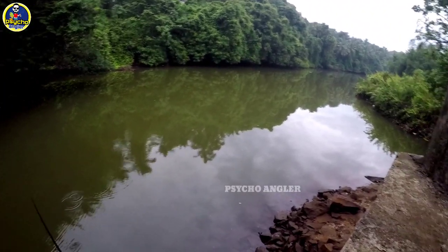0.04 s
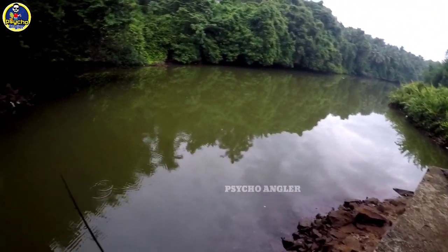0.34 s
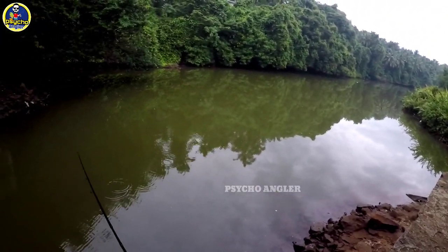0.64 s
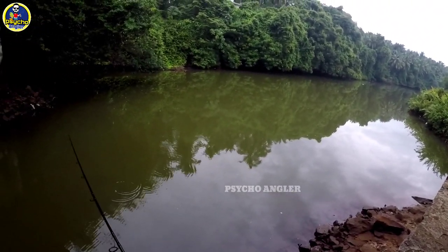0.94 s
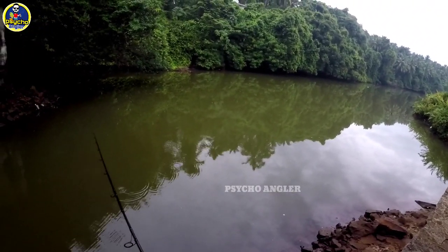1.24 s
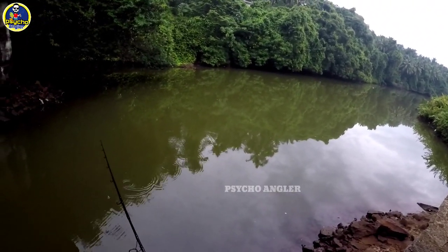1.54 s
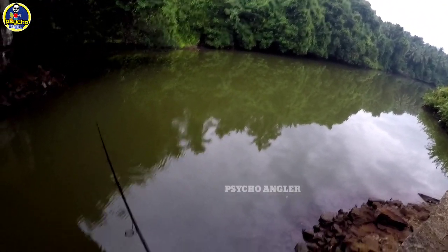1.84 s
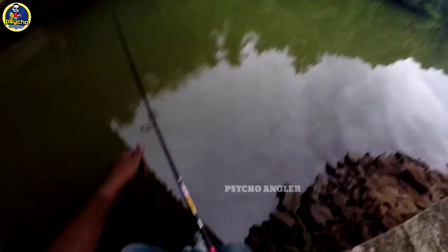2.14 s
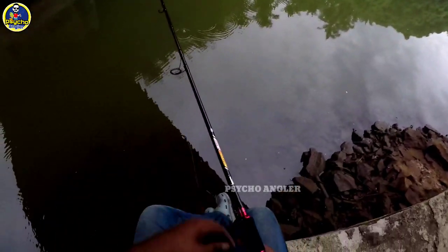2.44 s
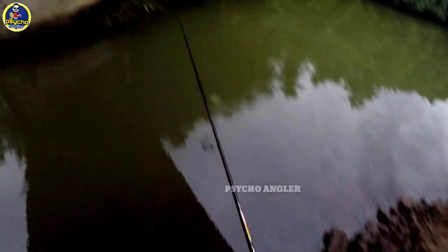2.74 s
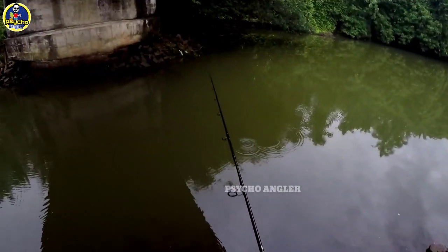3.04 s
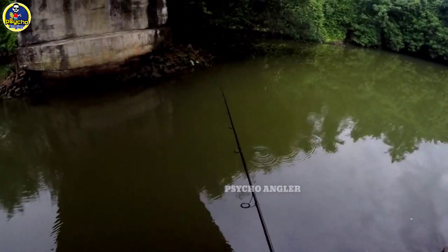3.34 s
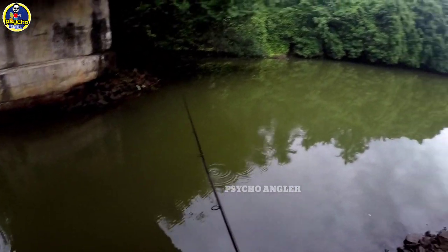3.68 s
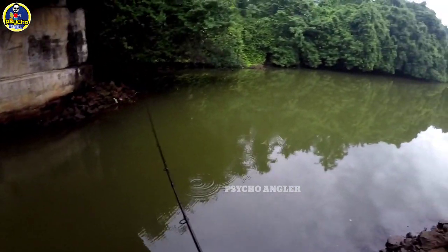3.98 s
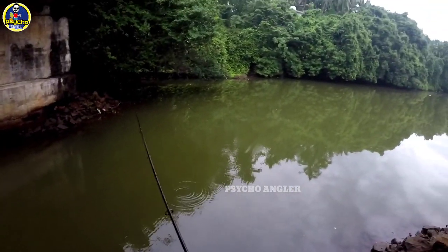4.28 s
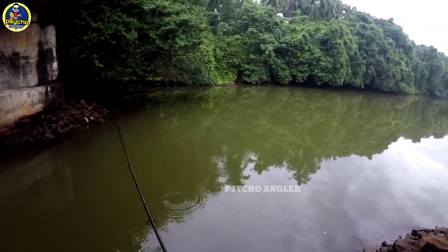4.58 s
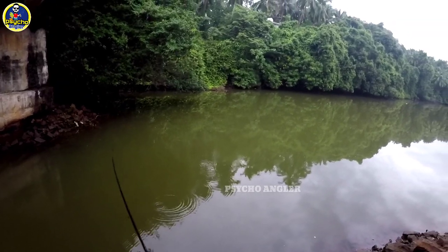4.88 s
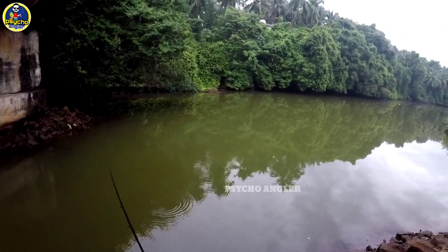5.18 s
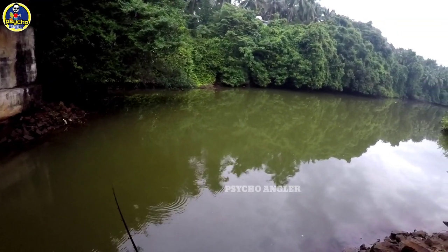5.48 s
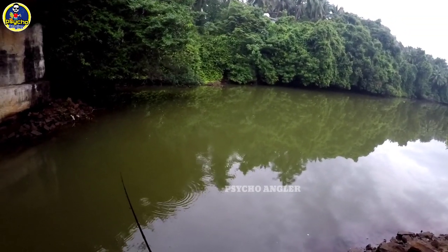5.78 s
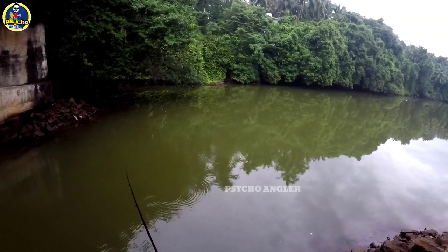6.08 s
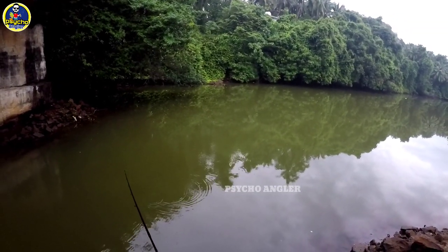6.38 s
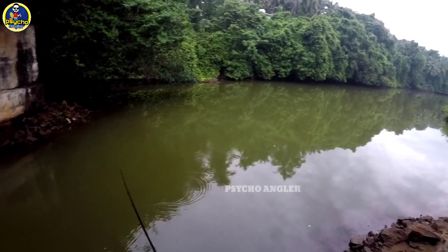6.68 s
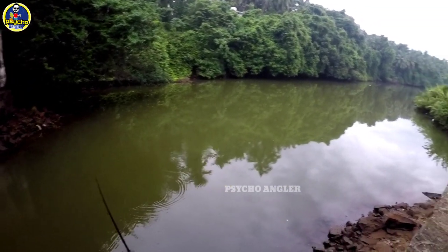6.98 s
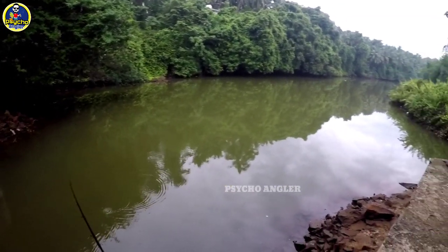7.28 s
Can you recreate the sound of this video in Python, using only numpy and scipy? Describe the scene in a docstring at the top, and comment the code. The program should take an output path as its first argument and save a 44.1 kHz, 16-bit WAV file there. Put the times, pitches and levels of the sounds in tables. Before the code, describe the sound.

Small birds chirp faintly by a river and a fishing reel snaps shut as heavy vehicles build to a low, booming rumble overhead.

```python
"""Fishing under a road bridge

Heavy traffic and a throbbing truck roll onto a concrete deck, which booms in its low modes, while
tyres roar faintly and distant brake discs squeal. Birds whistle, chirp and scold in the riverbank
trees. Close by, line swishes off a rod, the reel snaps shut and a sleeve brushes past."""
import sys
import numpy as np
from scipy import signal
from scipy.fft import rfft, irfft
from scipy.io import wavfile
from scipy.ndimage import uniform_filter1d

SR = 44100
rng = np.random.default_rng(int(sys.argv[2]) if len(sys.argv) > 2 else 0)


def wrap_up_sound(samples):
    """Save the sound to the file named by the first command line argument, as 16-bit audio."""
    columns = np.atleast_2d(samples).T
    # keep every value between -1 and 1, then stretch to whole-number steps
    tamed = np.clip(columns, -1, 1)
    steps = np.round(tamed * 32767).astype(np.int16)
    wavfile.write(sys.argv[1], SR, steps)


N = 331632
TIME = np.arange(N) / SR
SIDE = np.array([[1], [-1]])  # adds to the left ear, subtracts from the right


# weight of traffic, as the shaking of the spans: (time [s], level [dB])
DECK_LOAD = [(0, -66), (0.65, -51), (1.3, -53), (1.85, -54.5), (2.15, -50.5), (2.5, -42.5), (3.3, -33.5),
             (4.2, -29), (4.45, -25.5), (5.0, -25), (5.4, -21.5), (5.65, -23), (5.85, -22.5), (6.1, -23),
             (6.7, -24), (7.3, -24.5), (7.52, -25.5)]
# sub, boom and drum resonances of the bridge: (frequency [Hz], width [Hz], level [dB])
SPAN_MODES = [(19.75, 1.31, -7), (26.8, 3, -2), (40.58, 2.1, 0), (46.8, 9.5, -4)]
GIRDER_MODES = [(63.43, 1.5, -3.5), (76.8, 1.8, -1.2)]
SLAB_MODES = [(99.4, 3.1, 4.5), (122.11, 1.5, 1.5), (161.7, 3.6, -10)]

def bridge(full_load_db=-22, axles_past_s=6.59, settle_db_per_s=14):
    """Under one load the spans heave, the girders boom and the slab drums, all nearly mono."""
    span_db = along(DECK_LOAD)[0]
    load_db = span_db - full_load_db
    settling_db = settle_db_per_s * np.maximum(TIME - axles_past_s, 0)
    girder_db = full_load_db - 4.5 + 1.055 * load_db - settling_db
    slab_db = full_load_db - 6.5 + 1.12 * load_db
    parts = (span_db, SPAN_MODES, 65), (girder_db, GIRDER_MODES, 110), (slab_db, SLAB_MODES, 220)
    out = 0
    for level_db, modes, lowpass_hz in parts:
        mid, side = shaken(modes, lowpass_hz), shaken(modes, lowpass_hz)
        out += from_db(level_db + 1.5 * drift(8)) * (mid + from_db(-23) * side * SIDE)
    return panned(out, pan_db=-0.7)


def shaken(modes, lowpass_hz, steady_s=0.2):
    """Rolling wheels shake a set of modes; many axles together keep the power even."""
    out = np.zeros(N)
    for hz, width_hz, db in modes:
        radius = np.exp(-np.pi * width_hz / SR)
        feedback = [1, -2 * radius * np.cos(2 * np.pi * hz / SR), radius ** 2]
        force = rng.standard_normal(N + SR)
        out += from_db(db) * rms_one(signal.lfilter([1, 0, -1], feedback, force)[SR:])
    out = signal.sosfilt(signal.butter(5, lowpass_hz, fs=SR, output="sos"), out)
    window = int(steady_s * SR)
    power = uniform_filter1d(uniform_filter1d(out ** 2, window), window)
    return out / np.sqrt(power + 1e-12)


# the truck's pass: (start [s], attack [s], hold [s], release [s])
TRUCK_PASS = (6.0, 0.83, 0.63, 0.8)
# its engine orders: (multiple of the firing rate, level [dB])
TRUCK_ORDERS = [(1, -21), (1.5, -35), (2, -38), (2.5, -33), (3, -39), (4, -49), (6, -54)]

def truck(firing_hz=40.2, waver=0.01207, throb_db=2.5):
    """A big engine fires steadily as it rolls across, throbbing through the deck."""
    phase = 2 * np.pi * np.cumsum(firing_hz * (1 + waver * drift(4.3))) / SR
    firing = sum(from_db(db + throb_db * drift(2.8)) * np.sin(order * phase)
                 for order, db in TRUCK_ORDERS)
    return panned(np.sqrt(2) * swell(*TRUCK_PASS) * firing, pan_db=-0.5)


# one sub thump: (time [s], half-width [s], pitch [Hz], peak [dB])
AXLE_JOLT = (5.85, 0.02, 37.5, -20.5)

def jolt():
    """A heavy axle drops over a joint and the span heaves once."""
    s, width_s, hz, db = AXLE_JOLT
    return from_db(db) * bump(s, width_s) * np.sin(2 * np.pi * (hz * TIME + rng.random()))


# engine hums: (start [s], length [s], pitch [Hz], level [dB])
BOOMS = [(2.45, 0.35, 159.2, -41.5), (3.0, .4, 159, -42), (3.38, 0.32, 198.8, -39.5),
         (4.33, .3, 221.8, -44.5), (4.42, 0.39, 255, -49.5), (6.15, 0.52, 263.4, -49),
         (6.8, 0.46, 183.6, -38), (7.1, 0.44, 160.5, -33.5)]
# contour of each: (position [0-1], pitch ratio, level [dB])
BOOM_SHAPE = [(0, 1.01, -13), (.35, 1, -0.5), (.7, 1, -1.5), (1, 0.97, -14)]

def booms():
    """Passing engines swell into brief, wavering hums in the hollow under the deck."""
    mid, side = (glides(BOOMS, BOOM_SHAPE, rasp=0.013, rasp_hz=17) for _ in range(2))
    return panned(mid + from_db(-20) * side * SIDE, pan_db=-2.0)


# fader moves of the traffic bed: (time [s], tyre roar [dB], engine drone [dB])
TRAFFIC = [(0, -58.5, -42.5), (1.2, -57, -41.5), (2.1, -55.5, -40.5), (3.5, -55, -40.5),
           (5.4, -52.5, -40.5), (6.1, -53, -38.5), (6.7, -51, -40), (7.1, -49.5, -37.5),
           (7.52, -50.5, -38.5)]
# colours of its three layers: (frequency [Hz], level [dB])
DRONE_EQ = [(60, -35.5), (120, -27.5), (140, -3.5), (158, 0), (185, -1.5), (215, -6.5), (260, -13),
            (315, -19), (420, -44.5), (700, -72)]
FAR_ROAD_EQ = [(200, -28), (350, 2), (520, 2), (700, -6), (1000, -11), (2000, -35), (6000, -41)]
TYRE_EQ = [(400, -17.5), (650, -1.5), (900, -0.5), (1150, -1.5), (1600, -2.5), (2300, -6.5), (3200, -10.5),
           (5000, -16.5), (7500, -16.5), (11000, -29), (15000, -57)]

def road(light_traffic_db=-58):
    """Engines drone under the deck; the far road murmurs, nearer tyres roar over the parapet."""
    tyre_db, drone_db = along(TRAFFIC)
    far_db = -61 + 0.57 * (tyre_db - light_traffic_db)  # rises with the flow
    drone = from_db(drone_db + 0.53 * drift(4.3)) * air_noise(DRONE_EQ)
    far = from_db(far_db) * air_noise(FAR_ROAD_EQ)
    tyres = from_db(tyre_db + 1.27 * drift(3.8)) * air_noise(TYRE_EQ)
    return panned(drone, pan_db=-2.0) + panned(far + tyres, pan_db=0.5)


# squeals, sinking as the wheel slows: (start [s], attack [s], hold [s], release [s], pitch [Hz],
# sink [Hz/s], level [dB], upper-mode trim [dB], octave trim [dB])
SQUEALS = [ (0.021, 0.23, 0.26, 1.4, 3974, 150, -66, -20, -30),
           (1.58, .1, .1, .13, 3410, 64, -55.5, -3, -35),
           (1.865, .03, .035, .24, 3395, 64, -54.5, -11, -35),
           (2.599, 0.062, 0.031, 0.13, 2927, 160, -59, -20, -28),
           (2.748, 0.13, 0.29, 0.2, 2870, 190, -64.5, -20, -30),
           (2.998, 0.5, 0.55, 0.68, 3732, 12, -54, -22, -21),
           (5.107, 0.038, 0.37, 0.36, 3392, 25, -50.5, -2, -28)]
# upper modes of a disc: (multiple of the pitch, level [dB])
DISC_MODES = [(1.125, -6.5), (2.755, -12), (2.875, -16.5)]
# flares on the main tone and its octave: (time [s], half-width [s], boost [dB])
PAD_GRABS = [(0.45, 0.022, 1), (3.595, 0.026, 10.5), (3.68, 0.021, 1.5), (3.98, 0.051, 2),
             (5.19, 0.025, 5.5), (5.3, 0.02, 3.5), (5.425, 0.022, 10), (5.477, .02, 9)]

def brakes(waver=0.00452, flutter_db=3.5):
    """Discs sing in a few unsteady partials as the pads stick and slip, and flare when a pad grabs."""
    out = np.zeros(N)
    grab_db = sum(db * bump(s, width_s) for s, width_s, db in PAD_GRABS)
    for start, attack_s, hold_s, release_s, start_hz, sink, db, upper_db, octave_db in SQUEALS:
        hz = (start_hz - sink * (TIME - start)) * (1 + waver * drift(57.5))
        phase = 2 * np.pi * np.cumsum(hz) / SR
        tone = np.sin(phase) + from_db(octave_db) * np.sin(2 * phase)
        tone *= from_db(grab_db + flutter_db * drift(62))
        upper = sum(from_db(mode_db) * np.sin(multiple * phase) for multiple, mode_db in DISC_MODES)
        upper *= from_db(upper_db + flutter_db * drift(28))
        out += np.sqrt(2) * from_db(db) * swell(start, attack_s, hold_s, release_s) * (tone + upper)
    return riverside(out, wet_db=-2.5, t60=0.57, build_s=0.01)


# bird cues: (start [s], length [s], pitch [Hz], level [dB])
WHISTLES = [(2.205, .245, 2160, -55.5), (2.53, .215, 2105, -53.5), (2.87, .16, 2000, -55),
            (3.17, .14, 1880, -62), (7.02, .24, 2160, -57.5), (7.37, .17, 2095, -56.5)]
SEEPS = [(.88, 0.083, 6480, -49.5), (2.96, 0.11, 6530, -51.5)]
CHIRPS = [(1.078, 0.062, 3660, -48), (2.28, 0.14, 3440, -60), (4.765, 0.0655, 3674, -48),
          (6.89, 0.069, 3610, -49.5)]
# contour of each call: (position [0-1], pitch ratio, level [dB])
WHISTLE_SHAPE = [(0, 1.07, -15), (.17, 1.035, -11), (.3, 1.022, -2), (.62, .995, 0), (.72, .97, -1),
                 (.88, .87, -2), (1, .825, -12)]
SEEP_SHAPE = [(0, 1.24, -16), (.38, 1.1, -6), (.5, 1.05, -0.5), (.75, .968, -2.5), (1, 0.98, -6.5)]
CHIRP_SHAPE = [(0, .98, -8), (.3, .99, -5), (.7, 1.02, -2), (1, 1.01, -2.5)]

def songbirds(quaver_db=2.2, seep_boost_db=2.0):
    """Quavering whistles, thin seeps and burry chirps, each at its own distance in the trees."""
    quaver = from_db(quaver_db * drift(45))
    whistle = quaver * glides(WHISTLES, WHISTLE_SHAPE, rasp=0.012, rasp_hz=120)
    whistle = riverside(whistle, wet_db=-3, t60=0.17, build_s=0.0033)
    seep = from_db(seep_boost_db) * glides(SEEPS, SEEP_SHAPE, rasp=0.006, rasp_hz=204)
    seep = riverside(seep, wet_db=7.5, t60=0.673, build_s=0.175)
    chirp = glides(CHIRPS, CHIRP_SHAPE, rasp=0.052, rasp_hz=406)
    chirp = riverside(chirp, wet_db=-0.5, t60=0.6, build_s=0.0044)
    return panned(whistle, pan_db=5.0) + panned(seep, pan_db=2.5) + panned(chirp, pan_db=-1.0)


# notes within the harsh calls: (start [s], length [s], pitch [Hz], level [dB])
SCOLD_NOTES = [ (3.398, 0.04, 4400, -55), (3.43, 0.11, 3250, -54), (3.485, 0.066, 2639, -53.5),
               (3.755, 0.069, 4546, -56), (3.8, 0.066, 3340, -50), (3.83, 0.075, 2765, -53),
               (3.86, 0.055, 5440, -60), (4.14, 0.048, 4800, -50), (4.135, 0.049, 5800, -61),
               (4.175, 0.0854, 3405, -47), (4.49, 0.043, 5090, -52.5), (4.52, .07, 4680, -55.5),
               (4.55, 0.15, 3543, -55), (4.54, 0.14, 3016, -54.5)]
# their falling contour: (position [0-1], pitch ratio, level [dB])
SCOLD_SHAPE = [(0, 1.035, -2), (.3, 1.008, -3.5), (.65, .99, 0), (1, .975, -8)]
# hoarse puffs around them: (start [s], hold [s], level [dB])
SCOLD_PUFFS = [(3.351, 0.085, -59), (3.72, 0.105, -54.5), (4.087, 0.1, -54.5), (4.425, 0.23, -56.5)]
# colour of a puff: (frequency [Hz], level [dB])
PUFF_EQ = [(1800, -29), (2800, 2.5), (3600, 3.5), (4300, -4), (5200, -7), (7000, -6), (10000, -20),
           (14000, -45)]

def scolding_bird(attack_s=0.028, release_s=0.065):
    """Each harsh call is a cluster of falling notes in a soft puff of hiss."""
    puffs = sum(from_db(db) * swell(s, attack_s, hold_s, release_s) for s, hold_s, db in SCOLD_PUFFS)
    notes = glides(SCOLD_NOTES, SCOLD_SHAPE, rasp=0.02, rasp_hz=500)
    calls = notes + puffs * rms_one(air_noise(PUFF_EQ)[0])
    return panned(riverside(calls, wet_db=0.5, t60=0.67, build_s=0.0043), pan_db=3.5)


# runs of line: (start [s], attack [s], hold [s], release [s], level [dB])
SWISHES = [(-0.03, 0.029, 0.19, 0.14, -50.5), (1.55, 0.112, 0.073, 0.15, -61)]
# their airy colour: (frequency [Hz], level [dB])
SWISH_EQ = [(1500, -8), (3000, -8.5), (5200, -8.5), (6300, -2.5), (7600, 0.5), (9000, -5.5), (10500, -5.5),
            (11800, -18), (14000, -25)]

def line_swish(flutter_db=1.7):
    """Fishing line hisses past the rod."""
    running = sum(from_db(db) * swell(*timing) for *timing, db in SWISHES)
    return panned(running * from_db(flutter_db * drift(40)) * air_noise(SWISH_EQ), pan_db=-3.0)


# hits of the bail: (time [s], level [dB])
REEL_CLICKS = [(2.9135, -27), (2.9136, -27), (2.9242, -27.5), (2.9246, -32), (2.927, -31), (2.9355, -38)]
# ring of the reel's wire and housing: (frequency [Hz], level [dB], t60 [s])
REEL_MODES = [(3570, -8, 0.0056), (4740, -3, 0.0069), (7200, 1.5, 0.0089), (8280, -3, 0.0042)]

def reel():
    """The reel's bail snaps over and rebounds, ringing briefly."""
    clicks = metal_hits(REEL_CLICKS, REEL_MODES, ring_db=-7, snap_db=0, snap_t60=0.025)
    return riverside(clicks, wet_db=0, t60=0.95, build_s=0.0013)


# flicks of the line: (time [s], level [dB])
LINE_TICKS = [(1.294, -57), (1.303, -59), (3.757, -53), (5.766, -55.5), (6.7735, -52.5), (6.804, -47)]
# ping of the rod ring: (frequency [Hz], level [dB], t60 [s])
ROD_RING_MODES = [(4700, -2.5, 0.0246), (5300, -5, .012), (7200, 4, .008)]

def line_ticks():
    """The line flicks a small metal ring on the rod, which pings."""
    pings = metal_hits(LINE_TICKS, ROD_RING_MODES, ring_db=0, snap_db=3, snap_t60=0.0127)
    return riverside(pings, wet_db=-9, t60=0.2, build_s=0.002)


# bright edge of a hit: (frequency [Hz], level [dB])
SNAP_EQ = [(500, -30), (2000, -6), (3500, -3), (7200, 8), (10000, -5), (14000, -22)]

def metal_hits(hits, modes, ring_db, snap_db, snap_t60):
    """A small metal part is struck: a dry snap of noise over its decaying modes."""
    out, t = np.zeros(N), TIME[:SR // 8]
    ring = sum(from_db(ring_db + db - 60 * t / t60) * np.sin(2 * np.pi * hz * t)
               for hz, db, t60 in modes)
    grit = air_noise(SNAP_EQ)[0]
    grit /= np.abs(grit).max()
    for s, db in hits:
        at = slice(int(s * SR), int(s * SR) + len(t))
        out[at] += from_db(db) * (ring + grit[at] * from_db(snap_db - 60 * t / snap_t60))
    return out


# sleeve strokes: (time [s], level [dB])
BRUSHES = [(2.15, -56.5), (2.38, -54), (2.73, -53.5), (3.0, -55), (3.68, -54)]
# their muffled colour: (frequency [Hz], level [dB])
CLOTH_EQ = [(150, -20.5), (330, 12), (520, 1.5), (750, -1), (1200, -12), (2500, -37), (8000, -40)]

def sleeve(half_width_s=0.0536):
    """Each brush of cloth is a soft, dull swell."""
    return sum(from_db(db) * bump(s, half_width_s) for s, db in BRUSHES) * air_noise(CLOTH_EQ)


# tyre tones: (start [s], length [s], pitch [Hz], level [dB])
WHINES = [(1.15, 0.22, 533, -57.5), (2.33, .15, 640, -60), (4.1, 0.3, 607.6, -59), (4.55, 0.41, 477, -61.5)]
# contour of each: (position [0-1], pitch ratio, level [dB])
WHINE_SHAPE = [(0, 1.01, -10), (.3, 1, -2.5), (.7, 1, -6), (1, 1.003, 0.5)]

def tyre_whine():
    """Far tyres whine briefly."""
    tones = glides(WHINES, WHINE_SHAPE, rasp=0.017, rasp_hz=40)
    return riverside(tones, wet_db=-11, t60=0.72, build_s=0.01)


# colour of the noise floor: (frequency [Hz], level [dB])
HISS_EQ = [(300, 10), (1500, -12.5), (2800, 6.5), (4000, -3.5), (5200, -1), (7300, 0.5), (9000, 0),
           (10600, 4), (11500, -6.5), (13500, -8), (15000, -24)]

def hiss():
    """A faint, steady hiss sits behind everything."""
    return from_db(-60.5) * panned(air_noise(HISS_EQ), pan_db=-3.0)


# stereo width of the open air: (frequency [Hz], side minus mid [dB])
AIR_WIDTH = [(60, 3.5), (160, -19), (270, -3.5), (440, 4.5), (720, 5.5), (1190, 3.5), (1950, 0),
             (3500, -4.5), (5300, 0), (8700, 2), (14000, 0)]

def air_noise(eq):
    """Coloured noise arriving from all sides; its mid channel has unit power."""
    mid, side = rfft(rng.standard_normal((2, N))) * eq_gain(eq)
    mid, side = irfft(mid, N), irfft(side * eq_gain(AIR_WIDTH), N)
    return (mid + side * SIDE) / np.std(mid)


def riverside(x, wet_db, t60, build_s):
    """Direct sound plus dense scatter from piers, deck and trees, which builds up and dies away."""
    t = TIME[:SR]
    scatter = rng.standard_normal((2, SR)) * from_db(-60 * t / t60) * (1 - np.exp(-t / build_s))
    scatter /= np.sqrt(np.sum(scatter ** 2, axis=1, keepdims=True))
    tail = signal.fftconvolve(x[None], scatter, axes=1)[:, :N]
    wet = from_db(wet_db)
    return (x + wet * tail) / np.sqrt(1 + wet ** 2 / 2)


def glides(notes, shape, rasp, rasp_hz):
    """One voice repeats its gliding note; pitch flutter makes it waver or, when fast, turn hoarse."""
    out, flutter = np.zeros(N), 1 + rasp * drift(rasp_hz)
    for start, length, pitch_hz, db in notes:
        now = (TIME >= start) & (TIME < start + length)
        position = (TIME[now] - start) / length
        ratio, shape_db = along(shape, position)
        edges = np.clip(np.minimum(position, 1 - position) / 0.01, 0, 1)
        phase = 2 * np.pi * np.cumsum(pitch_hz * ratio * flutter[now]) / SR
        out[now] += np.sqrt(2) * edges * from_db(db + shape_db) * np.sin(phase)
    return out


def swell(start, attack_s, hold_s, release_s, range_db=18.5):
    """Envelope that climbs range_db over the attack, holds, then loses range_db per release time."""
    age = TIME - start
    rise_left = np.maximum(1 - age / attack_s, 0)
    fallen = np.maximum(age - attack_s - hold_s, 0) / release_s
    return from_db(-range_db * (rise_left + fallen)) * (age > 0)


def bump(peak_s, half_width_s):
    """Bell-shaped envelope."""
    return np.exp(-((TIME - peak_s) / half_width_s) ** 2)


def drift(rate_hz):
    """Smooth random wander of spread 1."""
    hz = np.arange(N // 2 + 1) * SR / N
    return rms_one(irfft(rfft(rng.standard_normal(N)) / (1 + (hz / rate_hz) ** 2), N))


def eq_gain(eq):
    """Gain of an EQ curve at each FFT bin, joined on a log-frequency axis."""
    hz = np.arange(N // 2 + 1) * SR / N
    points_hz, db = np.transpose(eq)
    return from_db(np.interp(np.log(hz + 1e-3), np.log(points_hz), db))


def along(rows, at=TIME):
    """Each column of an automation curve, joined by straight lines."""
    points, *columns = np.transpose(rows)
    return [np.interp(at, points, column) for column in columns]


def panned(x, pan_db):
    """Lean a sound to the left by pan_db."""
    return x * from_db(SIDE * pan_db / 2)


def from_db(db):
    """Decibels to gain."""
    return 10 ** (np.asarray(db) / 20)


def rms_one(x):
    """Scale to unit power."""
    return x / np.sqrt(np.mean(x ** 2) + 1e-20)


def scene():
    """The mix: traffic overhead, birds in the trees, fishing foley up close and a faint backdrop."""
    traffic = bridge() + truck() + jolt() + booms() + road() + brakes()
    birds = songbirds() + scolding_bird()
    fishing = line_swish() + reel() + line_ticks() + sleeve()
    return traffic + birds + fishing + tyre_whine() + hiss()


def record(dry, low_cut_hz=17, fade_s=0.005, high_cut_hz=14850):
    """The microphone loses the deepest bass; the end gets a quick fade and the top is cut."""
    dry = signal.sosfilt(signal.butter(2, low_cut_hz, "high", fs=SR, output="sos"), dry)
    dry = dry * np.minimum((TIME[-1] - TIME) / fade_s, 1)
    return signal.sosfilt(signal.ellip(10, 0.1, 80, high_cut_hz, fs=SR, output="sos"), dry)


dry = scene()
out = record(dry)
wrap_up_sound(out)
```